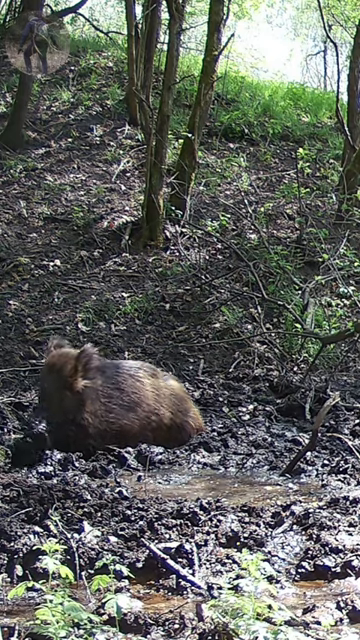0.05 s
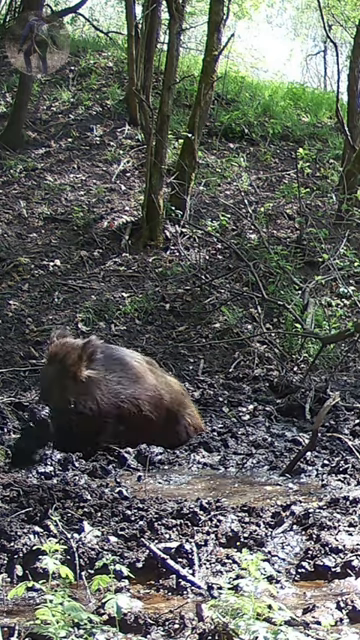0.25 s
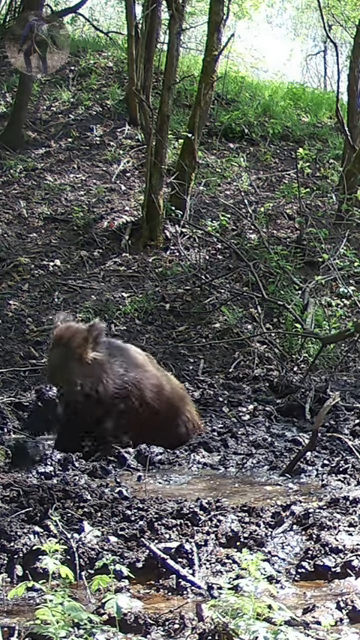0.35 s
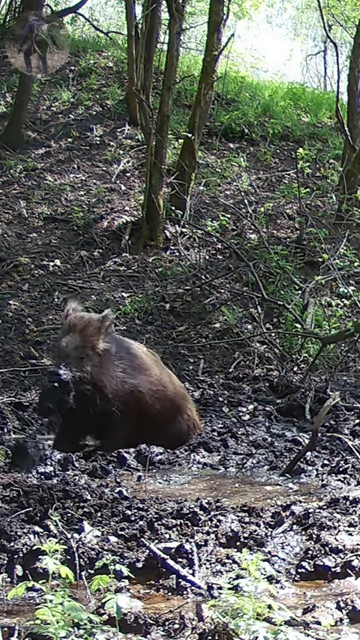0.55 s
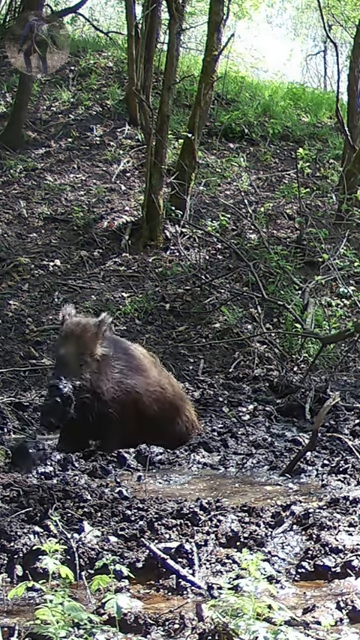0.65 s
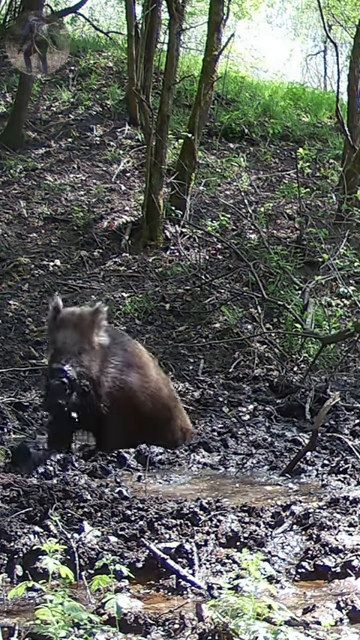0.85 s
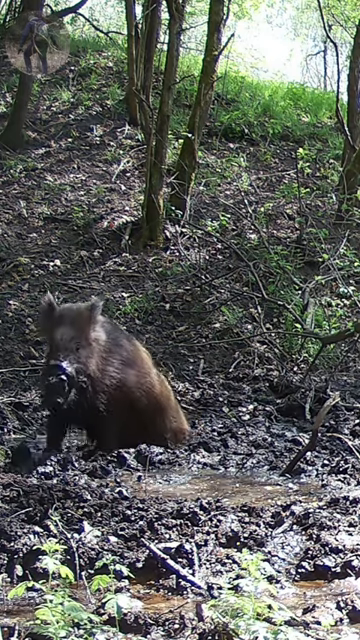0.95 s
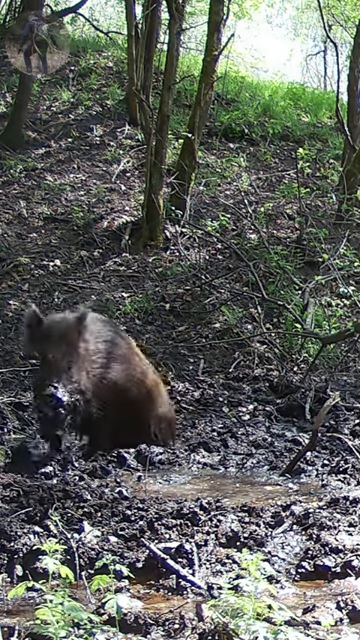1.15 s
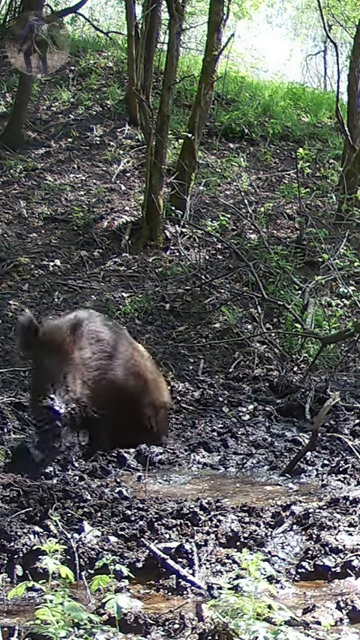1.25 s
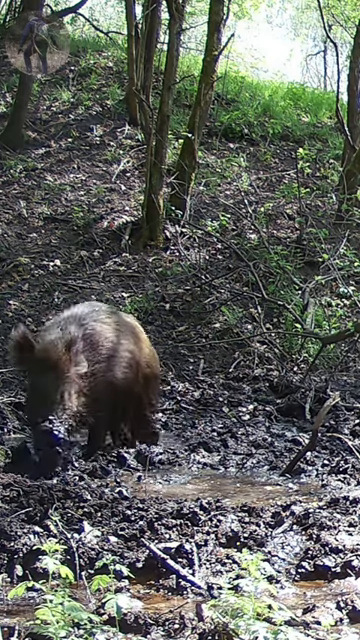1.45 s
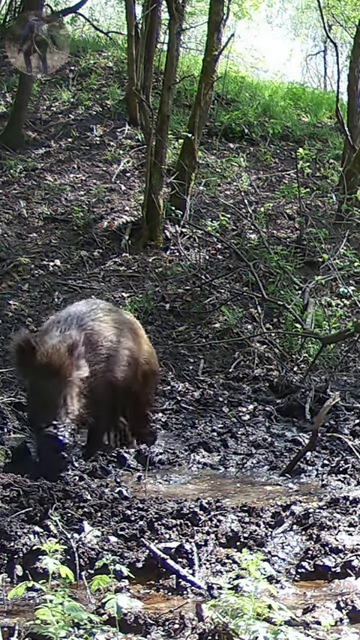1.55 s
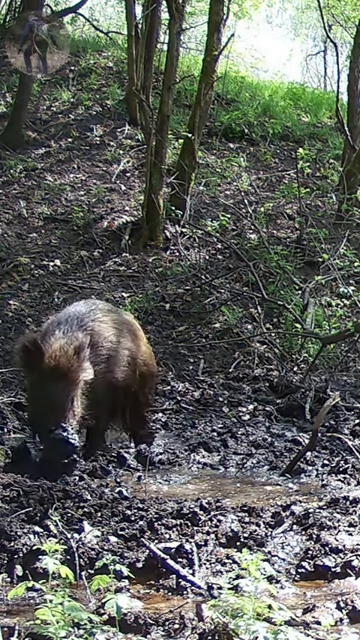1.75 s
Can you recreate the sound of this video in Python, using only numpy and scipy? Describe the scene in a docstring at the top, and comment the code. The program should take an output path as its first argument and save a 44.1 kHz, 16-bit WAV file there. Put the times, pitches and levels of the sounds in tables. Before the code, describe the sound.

Wet mud squelches and gulps as a wild boar heaves itself out of a wallow.

```python
"""A quiet, even hiss of open air comes first, with a low rumble and a faint far whistle that soon dies.
Then, in a wood a few metres from a single microphone, a wild boar heaves itself out of a mud wallow.
Air pockets gulp under its body, the wet mud peels off its hide in crackles, smacks and tiny bubbles,
and its legs pull free with a few plops. Trunks and the bank give back a weak, short echo."""
import sys
import numpy as np
from scipy import signal
from scipy.fft import rfft, irfft, next_fast_len
from scipy.io import wavfile
from scipy.ndimage import map_coordinates

SR = 44100
rng = np.random.default_rng(int(sys.argv[2]) if len(sys.argv) > 2 else 0)


def transcribe(signal):
    """Save signal, clipped to [-1, 1], as a 16-bit WAV file at the path in sys.argv[1]."""
    frames = np.atleast_2d(signal).T
    limited = np.clip(frames, -1, 1)
    pcm = np.round(limited * 32767).astype(np.int16)
    wavfile.write(sys.argv[1], SR, pcm)


N = 79380  # 1.8 s


def amp(db):
    return 10 ** (np.asarray(db) / 20)


def unit_rms(x):
    return x / np.sqrt(np.mean(x ** 2) + 1e-20)


def clock():
    return np.arange(N) / SR


def curve(rows):
    """(time, value) points joined by straight lines, one value per sample."""
    return np.interp(clock(), *np.transpose(rows))


def wobble(rate):
    """A smooth random curve with `rate` knots a second."""
    return map_coordinates(rng.standard_normal(2048), [clock() * rate], mode="wrap")


def filtered(x, response):
    """x through a gain given as a function of frequency."""
    size = next_fast_len(N + SR // 4)
    return irfft(rfft(x, size) * response(np.fft.rfftfreq(size, 1 / SR)), size)[:N]


def coloured(x, spectrum, tilt_db=0):
    """x shaped by a spectrum table and a tilt per octave, at rms 1."""
    freqs, levels = np.transpose(spectrum)

    def response(hz):
        shape_db = np.interp(np.log(hz + 1), np.log(freqs), levels)
        return amp(shape_db + tilt_db * np.log2(np.clip(hz, freqs[0], freqs[-1])))
    return unit_rms(filtered(x, response))


# Spectrum of the hiss all round the microphone: (frequency [Hz], relative level [dB])
HISS_SPECTRUM = [(12, 8), (20, 3), (70, 0), (404, -11), (857, -16.5), (1040, -14), (1300, -18.5),
                 (1500, -17), (2030, -17.5), (2330, -17.5), (2840, -19), (3750, -19.5), (8880, -21.5),
                 (13900, -20.5), (15500, -26.5)]
# Spectrum of the low air in the wood: (frequency [Hz], relative level [dB])
RUMBLE_SPECTRUM = [(15, -14), (60, -11), (120, -19), (250, -13), (600, -80)]


def woodland_air(hiss_db=-54, rumble_db=-66):
    """The open air hisses evenly over a low, gently swaying rumble."""
    hiss = coloured(rng.standard_normal(N), HISS_SPECTRUM) * amp(hiss_db - 0.7 * wobble(5))
    rumble = coloured(rng.standard_normal(N), RUMBLE_SPECTRUM) * amp(rumble_db + 1.5 * wobble(14.5))
    return hiss + rumble


def far_whistle(pitch_hz=2335, half_width_hz=85, level_db=-66.5, hold_s=0.26, fade_s=0.05):
    """Far off, a narrow band of noise whistles faintly, then dies away."""
    band = filtered(rng.standard_normal(N), lambda hz: 1 / (1 + ((hz - pitch_hz) / half_width_hz) ** 2))
    envelope = np.clip(1 - (clock() - hold_s) / fade_s, 0, 1)
    return amp(level_db) * envelope * unit_rms(band)


def bubble_swarm(per_s, low_hz, high_hz, decay_cycles, spread_db):
    """A steady swarm of small damped bubbles of random pitch and size, at rms 1."""
    draws = rng.random((9000, 4))
    gap, pitch, size, jitter = draws.T
    start_s = (np.cumsum(0.5 + gap) + jitter - 0.5) / per_s
    heard = start_s < N / SR
    hz = low_hz * (high_hz / low_hz) ** pitch[heard, None]
    strength = amp(spread_db * np.minimum(-np.log(1 - size[heard, None]), np.pi))
    offsets = np.arange(SR // 80)
    cycles = hz * offsets / SR
    envelope = np.exp(-cycles / decay_cycles) * (1 - np.exp(-2 * cycles))
    rings = strength * np.sqrt(hz) * envelope * np.sin(2 * np.pi * cycles)
    positions = (start_s[heard, None] * SR).astype(int) + offsets
    return unit_rms(np.bincount(positions.ravel(), rings.ravel(), N)[:N])


# Mud peeling off the hide, a few metres away: (time [s], level [dB])
PEEL_LEVEL = [(0, -95), (.22, -66), (.30, -57.5), (.35, -46.5), (.385, -46.5), (.41, -51.5), (.46, -54),
              (.505, -50.5), (.54, -50), (.59, -56), (.63, -53), (.67, -50), (.72, -59.5), (.9, -63.5),
              (1.0, -61.5), (1.11, -67), (1.19, -59.5), (1.25, -64), (1.33, -59.5), (1.53, -65.5),
              (1.8, -57.5)]
# Slurry churning in the wallow: (time [s], level [dB])
CHURN_LEVEL = [(0, -68), (.19, -66.5), (.22, -55), (.27, -55.5), (.36, -47.5), (.405, -69), (.43, -50.5),
               (.465, -57.5), (.51, -54.5), (.56, -56.5), (.66, -59.5), (.73, -63.5), (.82, -60.5),
               (.88, -65), (1.02, -65.5), (1.13, -63), (1.3, -66.5), (1.8, -66.5)]
# Spectrum of peeling mud, here and in the smacks: (frequency [Hz], relative level [dB])
CRACKLE_SPECTRUM = [(500, -36), (1200, -14.5), (2000, -7), (2600, -4), (3200, 1), (4300, -6.5), (5200, -7),
                    (6000, 1.5), (7400, -3), (8200, -10), (9300, -5), (12000, -18.5), (15500, -35)]
# Spectrum of the slurry: (frequency [Hz], relative level [dB])
SLURRY_SPECTRUM = [(150, -12), (380, -8), (560, -2), (740, 0.5), (1000, -2.5), (1400, -5), (2000, -14),
                   (3000, -44), (6000, -45)]


def squelch():
    """The peeling film crackles finely and the churned slurry bubbles lower down, both in clumps."""
    fine = bubble_swarm(per_s=4000, low_hz=1320, high_hz=14000, decay_cycles=3.5, spread_db=2)
    coarse = bubble_swarm(per_s=1100, low_hz=321.3, high_hz=2576, decay_cycles=3.8, spread_db=3)
    crackle = coloured(fine, CRACKLE_SPECTRUM) * amp(curve(PEEL_LEVEL) + 2.03 * wobble(110))
    slurry = coloured(coarse, SLURRY_SPECTRUM) * amp(curve(CHURN_LEVEL) + 2.0 * wobble(59.6))
    return crackle + slurry


def bubble(peak_s, hz, swell_s, fade_s, octaves_per_s):
    """Envelope and phase of a gliding air pocket; swell and fade are half-amplitude times."""
    t = clock() - peak_s
    envelope = 0.5 ** np.where(t < 0, np.abs(t / swell_s) ** 2.5, np.abs(t / fade_s) ** 1.55)
    pitch = hz * 2 ** (octaves_per_s * np.clip(t, -2 * swell_s, 2 * fade_s))
    return envelope, 2 * np.pi * (np.cumsum(pitch) / SR + rng.random())


# Air pockets opening under the boar, each at its peak:
# (time [s], level [dB], pitch [Hz], swell [s], fade [s], glide [octaves/s])
AIR_POCKETS = [(.238, -50.5, 517, .01, 0.0054, 10.5), (.2478, -33.5, 428.3, .003, 0.0025, 8.5),
               (0.2822, -27, 665, .0066, .0075, -12), (.283, -36, 395.4, .004, .004, -25),
               (.293, -43, 450, .003, .004, 0), (.302, -63, 610, .003, 0.014, 2),
               (0.349, -28, 664, 0.004, 0.0014, -4.5), (.349, -40, 350, .004, .006, -1),
               (0.36, -38, 626, 0.00306, .009, 1.5), (0.3591, -44, 1315, .003, 0.015, -11),
               (0.389, -49, 840, 0.0044, 0.0046, 11.5), (0.442, -47.5, 611, 0.0016, .004, -29),
               (.472, -50, 784, .0015, 0.0046, -12), (.501, -43, 660, .007, 0.0036, 4),
               (0.5107, -44.5, 719, 0.0037, 0.0062, -9.5), (0.57, -50.5, 820, .002, 0.0035, 24.5),
               (0.7865, -46, 1743, 0.0037, .005, -10), (0.8298, -47, 735, 0.0016, .002, 1),
               (0.9157, -34, 555, 0.0021, 0.003, -45), (.925, -46, 496.4, 0.00291, 0.0085, -2.5),
               (.935, -52.5, 1593, .004, 0.0055, 0.5), (1.0151, -39, 843, .0018, 0.0022, 70),
               (1.022, -43, 466, .002, 0.0036, -28.5), (1.0358, -33.5, 541, 0.0032, 0.0019, 28),
               (1.083, -42.5, 397, 0.0018, 0.0084, -26), (1.31, -49.5, 555, .005, 0.0042, 17),
               (1.33, -50, 1007, 0.0052, 0.0047, 12), (1.558, -53, 750, .006, 0.0072, 9.5)]


def gulps(roughness=0.26, overtone_db=-18.5):
    """Large air pockets open with a short, hollow, slightly ragged note."""
    out = np.zeros(N)
    ragged = 1 + roughness * wobble(600)
    for peak_s, db, hz, swell_s, fade_s, glide in AIR_POCKETS:
        envelope, phase = bubble(peak_s, hz, swell_s, fade_s, glide)
        out += amp(db) * envelope * (np.sin(phase) + amp(overtone_db) * np.sin(2 * phase))
    return out * ragged


# Tiny bubbles in the wet film, each at its peak: (time [s], level [dB], pitch [Hz])
FILM_BUBBLES = [(0.248, -37.5, 3130), (.280, -48, 6400), (.335, -51, 7200), (0.346, -38, 3270),
                (0.355, -47, 7100), (0.3865, -40, 6300), (.3955, -38, 3175), (0.471, -40.5, 7550),
                (0.497, -44, 7150), (.514, -38, 3220), (.6375, -38, 3630), (.639, -39.5, 7300),
                (.644, -44, 2600), (.714, -48.5, 4650), (.752, -47, 3450), (0.753, -44.5, 6400),
                (1.218, -43, 3200), (1.22, -47, 2400), (1.467, -41, 3150), (1.623, -47, 2490),
                (1.69, -50.5, 7000), (1.78, -47.5, 6440)]


def pips():
    """Tiny bubbles burst and ring for a few milliseconds, rising slightly in pitch."""
    out = np.zeros(N)
    for peak_s, db, hz in FILM_BUBBLES:
        envelope, phase = bubble(peak_s, hz, swell_s=0.0015, fade_s=0.0021, octaves_per_s=6)
        out += amp(db) * envelope * np.sin(phase)
    return out


# Mud tearing loose from the boar: (time [s], level [dB], fade [s], brightness [dB/octave])
MUD_TEARS = [(.277, -46.5, .009, -5), (.357, -45, 0.03, -3), (0.3833, -36, 0.0032, 3.5),
             (.4505, -43.5, 0.0053, 12), (0.4695, -34.5, 0.0042, -5.5), (0.51, -39.5, 0.0087, -5),
             (.636, -40.5, 0.0092, 0), (.6655, -46, .005, 11), (.747, -47, .011, 0), (.781, -51, .010, -7),
             (0.815, -46.5, 0.0085, -14), (.8295, -45.5, 0.0065, -7), (.996, -54, .012, -6),
             (1.083, -50.5, 0.0066, 4), (1.18, -49.5, 0.0086, 4), (1.207, -45.5, 0.0054, 0),
             (1.214, -47, 0.01, -2), (1.292, -53, 0.0062, -14), (1.448, -52, 0.009, -1),
             (1.464, -48, 0.0049, -10), (1.619, -57, 0.007, -3), (1.779, -50, .008, 2)]


def smacks(attack_s=0.00065):
    """A sheet of mud lets go in a dense burst of crackle."""
    out = np.zeros(N)
    for start_s, db, fade_s, tilt_db in MUD_TEARS:
        t = np.maximum(clock() - start_s, 0)
        envelope = (1 - np.exp(-t / attack_s)) * np.exp(-(t / fade_s) ** 0.77)
        out += amp(db) * envelope * coloured(rng.standard_normal(N), CRACKLE_SPECTRUM, tilt_db)
    return out


def wood_echo(x, level_db=-18, t60_s=0.2, build_s=0.0063):
    """Trunks and the bank scatter a weak, short tail back to the microphone."""
    t = np.arange(SR // 2) / SR
    envelope = amp(-60 * t / t60_s) * (1 - np.exp(-t / build_s))
    tail = rng.standard_normal(len(t)) * envelope
    return amp(level_db) * signal.fftconvolve(x, tail / np.linalg.norm(tail))[:N]


def scene():
    """The wallow from a few metres, with the wood around it, in mono."""
    mud = squelch() + gulps() + pips() + smacks()
    return (mud + wood_echo(mud) + woodland_air() + far_whistle())[None]


def record(dry):
    """The microphone's channel passes nothing above its band limit."""
    top_hz = 15600
    return np.array([filtered(x, lambda hz: hz < top_hz) for x in dry])


dry = scene()
out = record(dry)
transcribe(out)
```